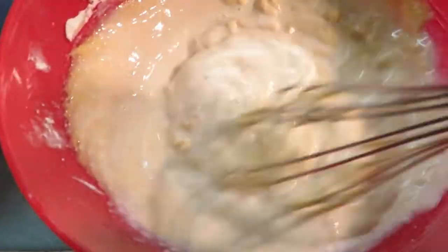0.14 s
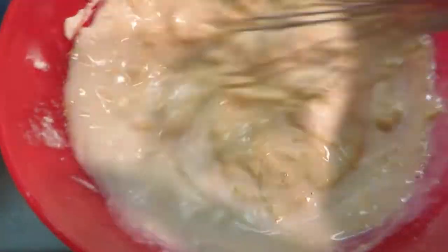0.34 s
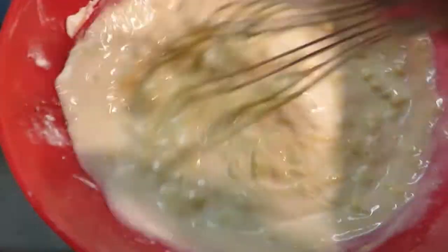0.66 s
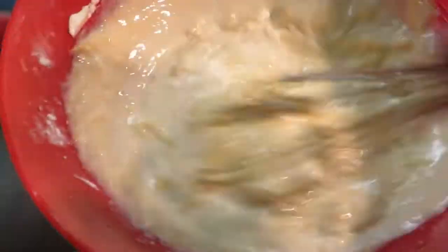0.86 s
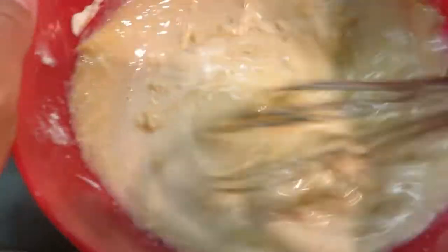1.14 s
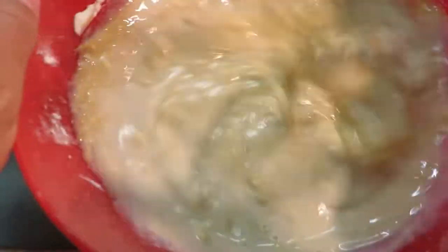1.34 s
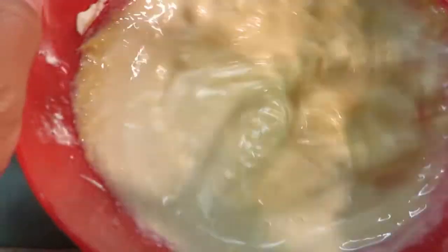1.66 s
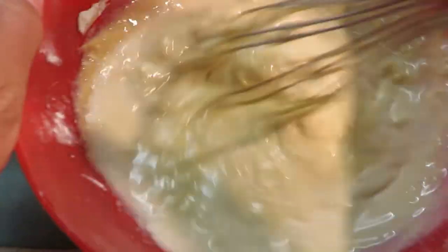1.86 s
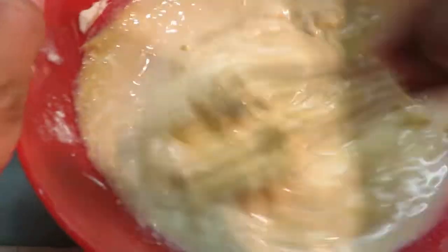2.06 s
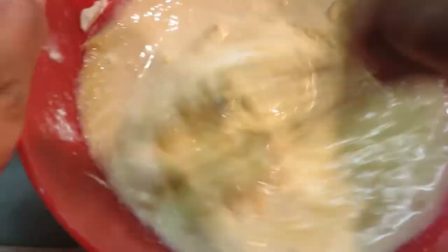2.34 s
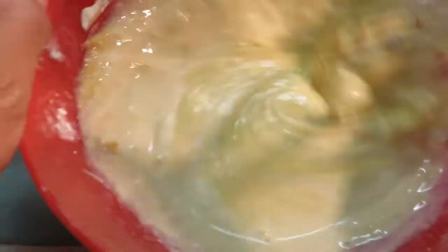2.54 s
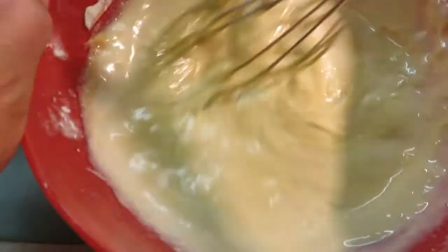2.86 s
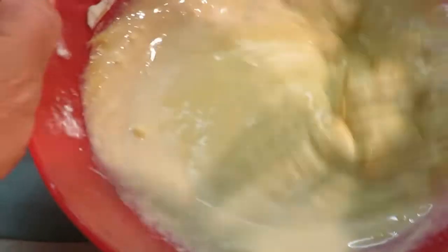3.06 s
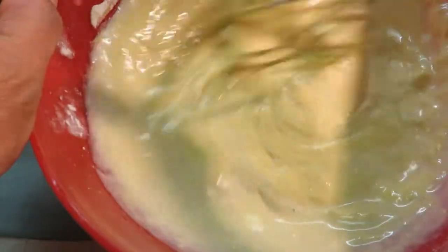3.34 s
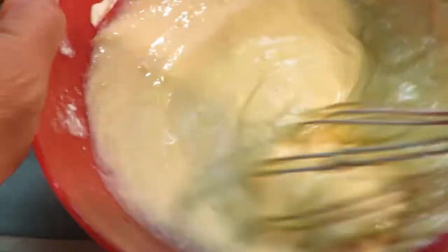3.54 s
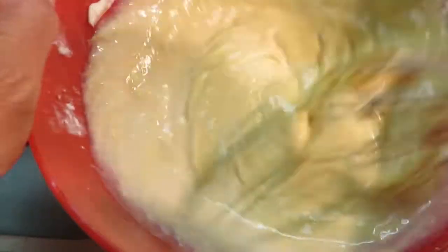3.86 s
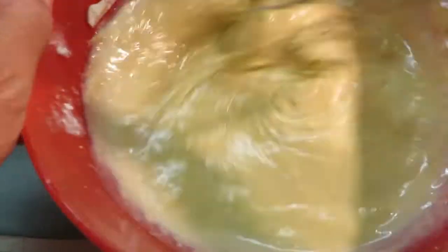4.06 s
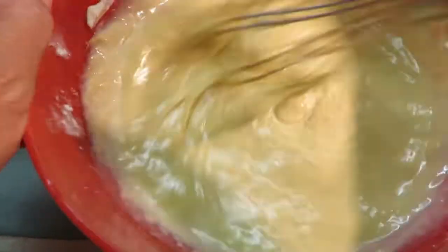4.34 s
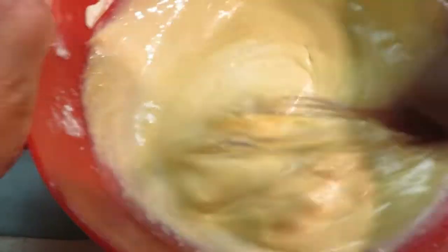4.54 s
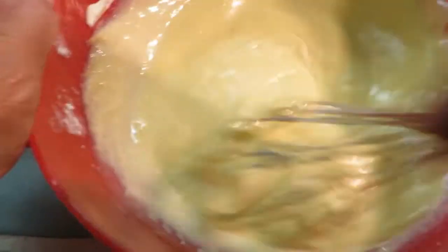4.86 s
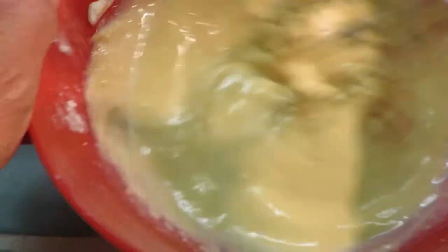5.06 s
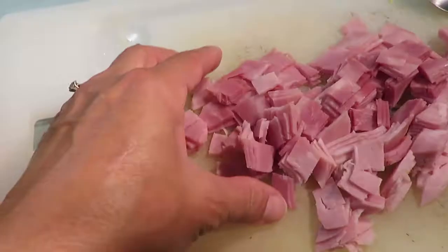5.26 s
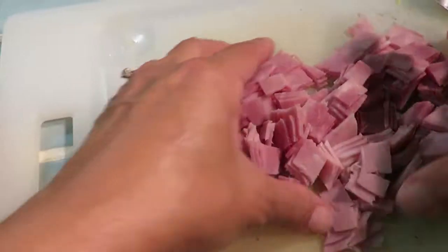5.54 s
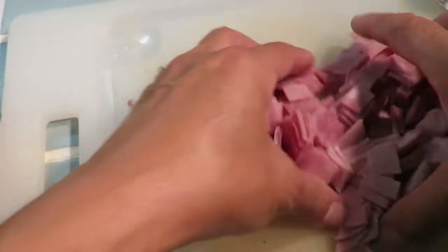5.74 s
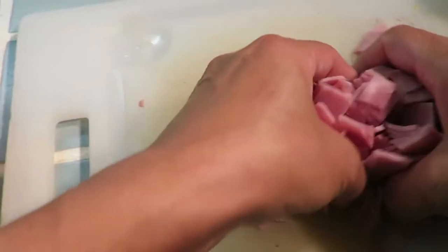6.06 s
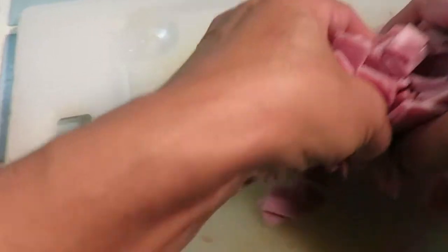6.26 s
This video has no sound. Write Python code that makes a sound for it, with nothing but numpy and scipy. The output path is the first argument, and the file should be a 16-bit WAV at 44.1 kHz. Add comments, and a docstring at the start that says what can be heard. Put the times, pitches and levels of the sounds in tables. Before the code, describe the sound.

A low, slightly beating fan hum with soft air rush runs throughout a small kitchen, heard from very close in stereo. At about 0.1 s a plastic bowl knocks loudly and hollowly on the counter with a rattling tail; the level ducks and creeps back over a second and a half. A second, weaker knock cluster follows near 0.4 s. The wire whisk keeps circling through thin batter, several strokes a second, with fizzy swishes, faint wire scrape, slosh and gurgle. Wet smacks and bubble pops stand out at 1.7, 2.2, 3.5 and 3.7 s, and the strokes become stronger and denser from 4 to 5 s. At 5.1 s the whisking cuts off, leaving fan, a faint airy whistle and a soft low bump. Around 5.8 s a board scuffs in a short stuttering rasp, then moist ham crackles stickily and bits tick until 6.3 s.

```python
"""A wire whisk circles in thin batter, close to a two-port microphone on a kitchen counter: torn films
swish and click, wires scrape, the batter gurgles, pops and pings as damped rings, and wet surfaces smack
as filtered noise. Among this a plastic bowl knocks twice, as decaying modes; the first knock ducks the
camera's gain, which creeps back over a second and a half. After 5.1 s the scene cuts to hands scooping
wet diced ham off a plastic board, which scuffs once in stick-slip crackle. A fan of tones and noise drones."""
import sys
import numpy as np
from scipy import signal
from scipy.fft import rfft, irfft, next_fast_len
from scipy.io import wavfile
from scipy.ndimage import uniform_filter1d, map_coordinates

SR = 44100
rng = np.random.default_rng(int(sys.argv[2]) if len(sys.argv) > 2 else 0)


def unload_wav(signal):
    """Save mono or channel-first audio to the path in sys.argv[1] as 16-bit WAV at rate SR, clipped to [-1, 1]."""
    wavfile.write(
        sys.argv[1],
        SR,
        np.round(np.clip(np.atleast_2d(signal).T, -1, 1) * 32767).astype(np.int16),
    )


N = 282240
CUT_S = 5.115  # here the scene cuts from the bowl to the board


def amp(db):
    """Decibels to gain."""
    return 10 ** (np.asarray(db) / 20)


def unit(x):
    """Scale to rms 1."""
    return x / np.sqrt(np.mean(x ** 2) + 1e-20)


def along(points, hz):
    """Read a curve of (Hz, value) points on a log frequency axis."""
    f, v = np.transpose(points)
    return np.interp(np.log(hz + 1), np.log(f + 1), v)


def curves(rows):
    """One value per sample for each column after the time."""
    s, *columns = np.transpose(rows)
    return [np.interp(np.arange(N) / SR, s, column) for column in columns]


def wobble(rate):
    """A smooth random curve, rate knots a second."""
    knots = rng.standard_normal(int(N * rate / SR) + 4)
    return map_coordinates(knots, [np.arange(N) * rate / SR])


def filtered(x, response):
    """x times a response of frequency."""
    m = next_fast_len(x.shape[-1] + SR // 4)
    spectrum = rfft(x, m) * response(np.fft.rfftfreq(m, 1 / SR))
    return irfft(spectrum, m)[..., :x.shape[-1]]


def coloured(x, spectrum):
    """x shaped by the given spectrum, at rms 1."""
    return unit(filtered(x, lambda hz: amp(along(spectrum, hz))))


def fade(t, t60):
    """Exponential decay by 60 dB in t60 seconds."""
    return np.exp(-np.log(1000) * t / t60)


def add(track, s, sound):
    """Mix a sound into a track at s seconds."""
    part = track[..., max(round(s * SR), 0):][..., :sound.shape[-1]]
    part += sound[..., :part.shape[-1]]


def swells(rows):
    """Gain of overlapping gestures (crest s, dB, rise s, fall s); rise and fall each span 10 dB."""
    t = np.arange(N) / SR
    power = 0
    for s, db, rise, fall in rows:
        steps = np.minimum(np.maximum((s - t) / rise, (t - s) / fall), 10)
        power = power + amp(db - 10 * steps) ** 2
    return np.sqrt(power)


# Likeness of the two microphone ports. Each row: frequency in Hz, left-right likeness from 0 to 1.
PORT_LIKENESS = [(100, 1), (250, 0.99), (700, 0.8), (2000, 0.59), (4000, 0.89), (5500, 0.22), (7500, 0.19),
                 (9500, 0.15), (11000, 0.22), (15000, 0.25)]


def spread(pair):
    """Two unrelated signals to left and right, as alike at each frequency as the two ports hear it."""
    def mid_side_gains(hz):
        angle = np.arccos(np.clip(along(PORT_LIKENESS, hz), -1, 1)) / 2
        return np.array([np.cos(angle), np.sin(angle)])

    mid, side = filtered(pair, mid_side_gains)
    return np.array([mid + side, mid - side])


# Reverberation of the kitchen. Each row: frequency in Hz, t60 in seconds.
KITCHEN_DECAY = [(130, 0.66), (700, 0.48), (2000, 0.33), (10000, 0.26)]


def room(x, delay=.005):
    """The kitchen's answer, delay seconds late: each frequency dies at its own speed."""
    hz, t, z = signal.stft(rng.standard_normal((2, SR // 2)), SR, nperseg=256)
    t60 = along(KITCHEN_DECAY, hz)[:, None]
    tail = spread(signal.istft(z * fade(t, t60), SR, nperseg=256)[1])
    tail = np.pad(tail, ((0, 0), (round(delay * SR), 0))) / np.linalg.norm(tail[0])
    return signal.fftconvolve(np.atleast_2d(x), tail, axes=1)[:, :N]


def patchy(x, depth_db, span_hz, span_s):
    """Brief resonances come and go at random, as when pockets in the batter open and close."""
    z = signal.stft(x, nperseg=512, noverlap=384)[2]
    bins, frames = np.indices(z.shape[1:])
    place = [bins * SR / 512 / span_hz, frames * 128 / SR / span_s]
    field = map_coordinates(rng.standard_normal((128, 512)), place, order=2, mode="wrap")
    gain = amp(depth_db * np.minimum(field, 2))
    return unit(signal.istft(z * gain, nperseg=512, noverlap=384)[1][:, :x.shape[1]])


# The fan's tones as heard at the bowl. Each row: frequency in Hz, relative level in dB.
FAN_TONES_AT_BOWL = [(49, -19), (68, -11.5), (75.4, -7), (127, -17), (134.6, -8.5), (149, -16.5),
                     (177.6, -29.5), (226.1, -13.5), (339.1, -17), (396, -16), (473.7, -20.5)]
# The fan's tones as heard at the board. Each row: frequency in Hz, relative level in dB.
FAN_TONES_AT_BOARD = [(49, -12), (68, -7), (75.4, -4), (134.6, -9.5), (149, -17), (233, -11.5),
                      (242.2, -12.5), (263.8, -15.5), (366.1, -15)]
# Rush of the fan's air. Each row: frequency in Hz, relative spectrum level in dB.
FAN_AIR = [(20, -20), (42, -0.5), (62, 4.5), (95, 1.5), (135, 8.5), (195, -2.5), (260, -2), (380, -2.5),
           (520, -11.5), (800, -19), (1500, -25.5), (5400, -37), (5800, -38), (15000, -57)]
# Thin whistle in that air. Each row: frequency in Hz, relative spectrum level in dB.
FAN_WHISTLE = [(4300, -60), (5000, -4), (5350, 0), (5480, -16), (5700, -60)]
FAN_DB = -32.5  # gain of the whole drone
AIR_DB, WHISTLE_DB = -3.5, -36  # before that gain


def fan():
    """Slightly unsteady motor tones beat over rushing air; at the board the air also whistles faintly."""
    t = np.arange(N) / SR

    def tones(rows):
        total = 0
        for hz, db in rows:
            phase = 2 * np.pi * (hz * t + rng.random()) + 0.28 * wobble(5)
            total = total + amp(db) * np.sqrt(2) * np.sin(phase)
        return total

    at_board = np.clip((t - CUT_S) / 0.0057, 0, 1)
    hum = (1 - at_board) * tones(FAN_TONES_AT_BOWL) + at_board * tones(FAN_TONES_AT_BOARD)
    rush = patchy(spread(rng.standard_normal((2, N))), depth_db=1.5, span_hz=400, span_s=0.09)
    air = coloured(rush, FAN_AIR)
    whistle = at_board * amp(WHISTLE_DB) * coloured(spread(rng.standard_normal((2, N))), FAN_WHISTLE)
    return amp(FAN_DB) * (hum + amp(AIR_DB) * air + whistle)


def crackle(rate, scatter_db):
    """Two streams of tiny ruptures, rate a second, of uneven size, as when liquid films tear."""
    size = amp(scatter_db * np.minimum(rng.standard_normal(N), 2))
    return unit((rng.random(N) < rate / SR) * size * rng.standard_normal((2, N)))


def smacks(rows, body, attack=0.00091, width=0.92, uneven_db=3.8):
    """Short bright spits where a wet surface lets go, coloured by a small cavity and the body below."""
    track, t = np.zeros((2, N)), np.arange(SR // 12) / SR
    grid = np.linspace(0, SR / 2, 56)
    for s, db, hz, t60 in rows:
        cavity = amp(uneven_db * rng.standard_normal(len(grid)))

        def colour(f):
            hump = 1 / (1 + (np.log2((f + 1) / hz) / width) ** 2)  # width in octaves
            return body(f) * np.interp(f, grid, cavity) * hump

        spit = unit(filtered(rng.standard_normal((2, len(t))), colour))
        add(track, s, amp(db - 4) * spit * fade(t, t60) * (1 - np.exp(-t / attack)))
    return spread(track)


# The board slips and catches, some slips screeching brighter. Each row: crest in seconds, relative
# level in dB, rise in seconds per 10 dB, fall in seconds per 10 dB, rasp over that level in dB.
BOARD_SLIPS = [(5.799, -25, 0.015, 0.008, -28), (5.804, -25.5, 0.003, 0.0053, -7),
               (5.813, -21, 0.008, 0.009, -17), (5.826, -22.5, 0.0065, 0.0073, -11),
               (5.858, -32.5, 0.065, 0.019, -18)]
# Colour of the board's scuff. Each row: frequency in Hz, relative spectrum level in dB.
SCUFF_COLOUR = [(250, -11), (440, -2.5), (580, -7.5), (670, 6.5), (760, 3.5), (900, -8), (1040, -2),
                (1170, -12), (1290, -9), (1400, -15), (1530, -14), (1850, -29), (6000, -52)]
# Colour of the board's rasp. Each row: frequency in Hz, relative spectrum level in dB.
RASP_COLOUR = [(1200, -11), (2600, 0.5), (4200, -6), (5500, -11), (12000, -28)]
# The hands press and lift the ham. Each row: crest in seconds, relative level in dB, rise in seconds
# per 10 dB, fall in seconds per 10 dB.
HAM_GRABS = [(5.168, -52.5, 0.012, 0.012), (5.71, -59, 0.25, 0.044), (5.84, -46.5, 0.092, 0.1),
             (5.99, -46, 0.034, 0.061), (6.15, -60, .06, 0.34)]
# Colour of the ham's sticky crackle. Each row: frequency in Hz, relative spectrum level in dB.
STICKY_COLOUR = [(700, -6), (1800, 7), (3200, 10.5), (5000, 7), (9000, 6), (13200, 9.5), (15500, -1)]
# Bits of ham tick on the board. Each row: start in seconds, relative level in dB, centre in Hz,
# t60 in seconds.
HAM_TICKS = [(5.796, -23, 9000, .007), (5.9413, -33, 8500, 0.015), (5.9668, -33, 11000, .014),
             (6.1055, -31.5, 4600, 0.032), (6.1518, -43, 10000, 0.031), (6.2426, -34.5, 2600, 0.032)]


def board(bump_s=5.14, bump_hz=66, bump_db=-19):
    """A soft bump as a decaying sine, the board's stick-slip scuff, crackle and ticks of wet ham."""
    t, bump = np.arange(SR // 2) / SR, np.zeros(N)
    thud = np.sin(2 * np.pi * bump_hz * t) * fade(t, 0.4) * (1 - np.exp(-t / 0.0066))
    add(bump, bump_s, amp(bump_db) * thud)

    grip = patchy(spread(crackle(rate=5000, scatter_db=1.5)), depth_db=1.5, span_hz=111.6, span_s=.025)
    scuff = swells([slip[:4] for slip in BOARD_SLIPS]) * coloured(grip, SCUFF_COLOUR)
    screech = patchy(spread(crackle(rate=3000, scatter_db=3.0)), depth_db=4, span_hz=200, span_s=.02)
    rasp_rows = [(s, db + rasp_db, rise, fall) for s, db, rise, fall, rasp_db in BOARD_SLIPS]
    scuff += swells(rasp_rows) * coloured(screech, RASP_COLOUR)

    peeling = crackle(rate=7000, scatter_db=2.0) + amp(-12) * crackle(rate=320, scatter_db=3.0)
    ham = swells(HAM_GRABS) * amp(1.6 * wobble(50)) * coloured(spread(peeling), STICKY_COLOUR)
    ham = ham + smacks(HAM_TICKS, np.ones_like, width=0.68)
    return bump + scuff + ham + amp(-14.5) * room(scuff + ham)


# Blows of the bowl on the counter. Each row: start in seconds, relative level in dB, hardness in dB
# of the upper modes, level in dB of the lowest mode, level in dB of the wall's middle modes.
BOWL_BLOWS = [(0.1227, 19.5, -1, 1.5, 0.5), (0.1546, 1, -1, 4, -1), (0.187, -5, -16, -1, -6),
              (0.229, 8, -19, -21, 0), (0.2335, -11, -1, -4, -3), (0.371, 9.5, -1, -0.5, 2),
              (0.3825, 2.5, 1.5, 1, 5), (0.3882, 2.5, -5, -8, -2), (0.3954, 3, -12, -6, -1),
              (0.438, -4.5, -5, -9, -6), (0.535, -7.5, -19, -10, 1)]
# Modes of the bowl on the counter. Each row: frequency in Hz, relative level in dB, t60 in seconds.
BOWL_MODES = [(131.7, -8.5, 0.28), (179, -12, 0.18), (231, -4, 0.028), (306, -1.5, 0.039),
              (365, -9.5, 0.076), (515, -5.5, 0.039), (701, -1.5, 0.089), (693, -18.5, 0.3),
              (781, -16, 0.13), (891, -17.5, 0.12), (988, -22.5, 0.14), (1084, -27, 0.16),
              (1205, -9, 0.016), (1584, -1, 0.013), (2080, -9, 0.018), (2500, -11, 0.014),
              (3080, -2, 0.011), (3920, -4.5, 0.0071), (4530, -4, 0.006), (6480, -19, 0.008)]
# Loose rattle of the bowl's wall after a blow. Each row: frequency in Hz, relative spectrum level in dB.
RATTLE_COLOUR = [(150, -18), (400, 3), (750, 2), (1300, -10.5), (2500, -22), (5000, -40), (9000, -51)]
RATTLE_DB, RATTLE_T60_S = -21, 0.29


def knocks(lag=1.21, attack=0.00094, waver_db=1.5, waver=0.33, crack_db=-8):
    """Blows ring the bowl's modes, wavering as batter slops; soft ones start slowly, with weak upper modes."""
    track, t = np.zeros(N), np.arange(SR // 2) / SR
    knots = t[::SR // 100]
    crack_band = signal.butter(2, [1500, 6500], "bandpass", fs=SR, output="sos")

    def slop():
        return np.interp(t, knots, rng.standard_normal(len(knots))) * (1 - np.exp(-t / 0.013))

    for s, db, hard_db, boom_db, wall_db in BOWL_BLOWS:
        ring = np.zeros(len(t))
        for k, (hz, level, t60) in enumerate(BOWL_MODES):
            touch_db = boom_db if hz < 150 else 0 if hz < 600 else wall_db if hz < 1150 else hard_db
            strength = amp(level + rng.normal(0, 1) + touch_db + waver_db * slop())
            # the blow needs a moment to spread through the wall, so each mode lags the one before
            phase = 2 * np.pi * hz * t - k * lag + waver * slop()
            ring += strength * fade(t, t60) * np.sin(phase)
        crack = signal.sosfilt(crack_band, rng.standard_normal(len(t))) * fade(t, .01)
        rattle = amp(RATTLE_DB) * coloured(rng.standard_normal(len(t)), RATTLE_COLOUR)
        rattle *= fade(t, RATTLE_T60_S) * (1 - np.exp(-t / 0.0049))
        onset = 1 - np.exp(-t / (attack * amp(-hard_db)))
        add(track, s, amp(db - 7.0) * (ring + rattle + amp(hard_db + crack_db) * crack) * onset)
    dull = filtered(track, lambda hz: 1 / np.hypot(1, hz / 1900))
    return track + amp(-15) * room(dull)


def damped_ring(t, hz, cycles):
    """A sine that rings for a few cycles, as a bubble does when the liquid around it damps it."""
    ring = np.sin(2 * np.pi * hz * t) * fade(t, cycles / hz) * (1 - np.exp(-2 * t * hz))
    return ring / np.abs(ring).max()


def bubbles(rate, centre_hz, octaves, cycles, scatter_db):
    """A stream of small bubbles of random pitch and size."""
    t, track = np.arange(SR // 40) / SR, np.zeros(N)
    for s, pitch, size in rng.random((int(rate * N / SR), 3)):
        hz = centre_hz * 2 ** (octaves * (2 * pitch - 1))
        add(track, s * N / SR, amp(scatter_db * size) * damped_ring(t, hz, cycles))
    return unit(track)


# Short damped rings, low pops and high pings, some sounding together or along with a smack.
# Each row: start in seconds, peak in dB, pitch in Hz, cycles of ring.
POPS_AND_PINGS = [(1.086, -30, 920, 16), (1.3837, -27.5, 1940, 17), (1.535, -33, 1300, 100),
                  (1.671, -14.5, 1520, 15), (2.2045, -12, 1710, 19), (2.2213, -22.5, 1510, 9),
                  (2.3554, -26.5, 950, 17), (2.356, -31, 1740, 14), (2.491, -24, 3060, 24),
                  (2.8925, -25, 5200, 24), (2.9073, -24.5, 5800, 37), (2.851, -32, 2880, 18),
                  (2.8507, -26, 6700, 40), (3.332, -30, 930, 10), (3.332, -32, 1500, 13),
                  (3.332, -21.5, 7000, 87), (3.365, -28.5, 794, 16), (3.484, -23, 2000, 15),
                  (3.484, -32, 1040, 5.7), (3.72, -22, 2410, 40), (3.7225, -23, 2870, 37),
                  (3.721, -23, 3920, 32), (3.721, -25, 850, 35), (4.03, -33, 900, 16),
                  (4.078, -32, 1390, 33), (4.267, -29, 824, 14), (4.392, -32, 1410, 56),
                  (4.583, -25, 820, 16), (4.653, -30.5, 890, 24), (4.704, -25.5, 1404, 63),
                  (4.887, -24, 860, 12), (4.89, -33, 1490, 16), (4.067, -29, 2820, 27),
                  (4.438, -30.5, 1750, 16)]


def pops_and_pings():
    """Short damped rings, low pops and high pings, some sounding together or along with a smack."""
    track, t = np.zeros(N), np.arange(SR // 20) / SR
    for s, db, hz, cycles in POPS_AND_PINGS:
        add(track, s, amp(db) * damped_ring(t, hz, cycles))
    return track


# Resonances that colour the swish and the smacks. Each row: frequency in Hz, width in Hz, gain in dB.
WIRE_RESONANCES = [(3006, 470, 10.5), (4880, 920, 4.5), (6780, 410, 7.5), (7280, 500, 11), (9150, 290, 5),
                   (10570, 450, 3.5), (12140, 610, 6), (13460, 500, 7)]


def wires(f):
    """Gain of the whisk's resonances at each frequency."""
    return 1 + sum((amp(db) - 1) / (1 + (2 * (f - hz) / width) ** 2) for hz, width, db in WIRE_RESONANCES)


# Sweeps of the whisk through the batter. Each row: crest in seconds, relative level in dB, rise in
# seconds per 10 dB, fall in seconds per 10 dB.
WHISK_SWEEPS = [(0.0, -49.5, .05, 0.019), (0.16, -42, 0.028, 0.17), (0.25, -45.5, 0.061, 0.072),
                (0.55, -43, 0.14, 0.095), (0.85, -45, 0.15, 0.38), (1.17, -42.5, 0.069, 0.11),
                (1.29, -41, 0.01, 0.014), (1.42, -41.5, 0.036, 0.043), (1.58, -44.5, 0.16, 0.052),
                (1.72, -44.5, 0.1, 0.16), (1.88, -45, 0.16, 0.1), (2.01, -43.5, 0.12, 0.15),
                (2.16, -40, 0.014, 0.049), (2.31, -43, 0.11, 0.07), (2.72, -46.5, 0.18, 0.076),
                (2.9, -55, 0.025, 0.1), (3.15, -43, 0.12, 0.092), (3.63, -44.5, 0.22, 0.064),
                (3.74, -50, 0.013, 0.1), (3.9, -41, 0.072, 0.097), (4.09, -51, 0.016, 0.09),
                (4.22, -38.5, 0.064, 0.079), (4.42, -45, 0.034, 0.074), (4.55, -38.5, 0.061, 0.066),
                (4.72, -45.5, 0.032, 0.11), (4.86, -38, 0.066, 0.047), (5.025, -45, 0.019, 0.034),
                (5.1, -49, 0.024, 0.024)]
# Short low gurgling bursts in the batter, many under a smack. Each row: crest in seconds, relative
# level in dB.
GURGLE_BURSTS = [(1.537, -38), (2.358, -43), (2.85, -43.5), (3.333, -41), (3.366, -39), (3.724, -39.5),
                 (3.781, -37), (3.816, -39.5), (4.07, -36.5), (4.082, -37.5), (4.126, -42.5), (4.396, -38),
                 (4.585, -36.5), (4.702, -32), (4.891, -38)]
BURST_RISE_S, BURST_FALL_S = 0.0072, 0.016  # per 10 dB
BURST_SWISH_DB = -8.5  # swish that goes with a burst, over its gurgle gain
SETTLE_S, WAKE_DB = 0.094, -3  # the batter churns on behind the wires: time constant, level


def stirring():
    """Gains of the swish and of the gurgle: sweeps leave a churning wake, bursts lift both gains briefly."""
    sweep = swells(WHISK_SWEEPS)
    burst = swells([(s, db, BURST_RISE_S, BURST_FALL_S) for s, db in GURGLE_BURSTS])
    keep = np.exp(-1 / (SETTLE_S * SR))
    wake = signal.lfilter([1 - keep], [1, -keep], sweep)
    at_bowl = np.arange(N) / SR < CUT_S
    swish = at_bowl * np.hypot(sweep, amp(BURST_SWISH_DB) * burst)
    gurgling = at_bowl * np.hypot(burst, amp(WAKE_DB) * wake)
    return swish, gurgling


SPIT_COUNT, SPIT_DB, SPIT_HZ, SPIT_T60_S = 30, 22, 2800, 0.0083  # dB over the swish, at most


def spits(swish):
    """Small smacks at random moments of the whisking, following the strength of the swish around them."""
    rows = []
    for when, size, pitch in rng.random((SPIT_COUNT, 3)):
        s = when * CUT_S
        strength = swish[int(s * SR)] * (1 + size) / 2
        db = SPIT_DB + 20 * np.log10(strength + 1e-9)
        rows.append((s, db, SPIT_HZ * 2 ** (2 * pitch - 1), SPIT_T60_S))
    return rows


# How deep the whisk runs; deeper gurgles more and fizzes less. Each row: time in seconds, depth in dB.
WHISK_DEPTH = [(0, 0.5), (1.4, -3.5), (2.0, -5), (2.5, 0.5), (3.2, 3), (3.6, 1), (4.2, 2), (5.1, -1.5)]
# Colour of the fizz. Each row: frequency in Hz, relative spectrum level in dB.
FIZZ_COLOUR = [(2500, -27), (5000, -19), (6500, -6.5), (8500, 0), (10000, -3), (13800, -6), (15500, -13)]
# Colour of the slosh. Each row: frequency in Hz, relative spectrum level in dB.
SLOSH_COLOUR = [(600, -15), (1500, -4.5), (2400, -5), (4100, -3), (5500, -1), (8000, -24.5), (14000, -34)]
# Ring of the wires dragging on the bowl's floor. Each row: frequency in Hz, relative spectrum level in dB.
SCRAPE_COLOUR = [(2700, -23), (3200, -7), (3450, 4), (3700, -13), (4300, -34)]
# Colour of the gurgle. Each row: frequency in Hz, relative spectrum level in dB.
GURGLE_COLOUR = [(300, -2.5), (570, -10), (850, 1.5), (1000, -1), (1200, -11), (1420, 0), (1600, -6),
                 (2200, -5), (3000, -9), (6000, -49)]
FIZZ_DB, FIZZ_PER_DEPTH = 3.0, -0.41  # level over the swish, dB per dB of depth
SCRAPE_DB, SCRAPE_PER_DEPTH = -9.5, -1.35  # likewise; strongest when the whisk runs shallow
SLOSH_DB, FROTH_DB = -0.5, -5  # over the swish; froth is tiny bubbles bursting


def whisk(swish, gurgling):
    """Wires tear films into fizz, scrape the bowl, slosh batter and fold in air that gurgles and froths."""
    depth_db, = curves(WHISK_DEPTH)
    # countless tiny ruptures, with single droplets clicking among them
    ruptures = crackle(rate=12000, scatter_db=2.5) + amp(-13.0) * crackle(rate=200, scatter_db=6.0)
    tearing = patchy(spread(filtered(ruptures, wires)), depth_db=4.5, span_hz=199.2, span_s=.028)
    tearing = tearing * amp(1.63 * wobble(60))
    fizz = swish * amp(FIZZ_PER_DEPTH * depth_db + FIZZ_DB) * coloured(tearing, FIZZ_COLOUR)

    sloshing = patchy(tearing, depth_db=3.5, span_hz=160.3, span_s=0.02)
    slosh = swish * amp(SLOSH_DB) * coloured(sloshing, SLOSH_COLOUR)

    dragging = coloured(spread(crackle(rate=190, scatter_db=3.5)), SCRAPE_COLOUR)
    scrape = swish * amp(SCRAPE_DB + SCRAPE_PER_DEPTH * depth_db) * dragging

    air = bubbles(rate=350, centre_hz=1158, octaves=1.05, cycles=15.4, scatter_db=17.5)
    churn = patchy(spread(crackle(rate=2500, scatter_db=7.0)), depth_db=10.5, span_hz=120.5, span_s=0.035)
    gurgle = gurgling * amp(depth_db + 3.5) * coloured(amp(-7.5) * air + churn, GURGLE_COLOUR)

    froth = bubbles(rate=300, centre_hz=3005, octaves=1.0, cycles=39, scatter_db=14)
    return fizz + slosh + scrape + gurgle + swish * amp(FROTH_DB) * froth


# The loudest wet smacks. Each row: start in seconds, relative level in dB, centre in Hz, t60 in seconds.
WET_SMACKS = [(0.556, -26, 2460, 0.02), (0.677, -26, 2200, 0.025), (0.8265, -21, 7000, 0.022),
              (0.9922, -21.5, 6000, 0.012), (1.087, -23.5, 1970, 0.035), (1.1413, -23, 6000, .02),
              (1.3832, -22, 2420, 0.027), (1.4247, -19.5, 5970, 0.026), (1.5699, -22, 3100, 0.013),
              (1.5843, -17, 3000, 0.013), (1.6701, -13.5, 1900, 0.015), (1.7175, -21, 3430, 0.017),
              (1.8682, -20.5, 3800, 0.023), (1.8835, -16.5, 5200, 0.01), (1.9967, -17, 4500, 0.008),
              (2.2036, -5.5, 3140, 0.0083), (2.2213, -14, 2500, 0.01), (2.2335, -16.5, 2200, 0.0096),
              (2.4908, -23, 4470, 0.015), (2.5441, -32, 7140, 0.024), (2.5606, -23, 4500, 0.0097),
              (2.5894, -26, 4500, 0.009), (2.850, -20.5, 3000, 0.008), (2.8919, -20.5, 5300, 0.013),
              (2.9056, -24, 5340, 0.015), (3.1639, -19, 4500, 0.008), (3.3316, -14, 6360, 0.014),
              (3.3648, -18.5, 3380, 0.02), (3.400, -19.5, 3000, 0.01), (3.4162, -24, 3200, 0.008),
              (3.44, -25, 4000, 0.0064), (3.484, -12.5, 2400, 0.0085), (3.718, -6, 9500, 0.015),
              (3.7725, -12.5, 3070, 0.016), (3.782, -27, 6000, 0.012), (3.8114, -13, 7000, 0.011),
              (3.9047, -17, 4600, 0.0069), (4.064, -14, 6940, 0.017), (4.093, -16, 3560, 0.013),
              (4.131, -12, 7400, 0.014), (4.1468, -13, 7000, 0.009), (4.2044, -18, 3200, 0.014),
              (4.3116, -22, 2500, 0.01), (4.437, -13.5, 6000, 0.021), (4.582, -21, 1900, 0.012),
              (4.588, -17.5, 7000, .01), (4.678, -25, 3000, 0.01), (4.695, -17, 6500, .012),
              (4.6998, -10.5, 6150, 0.011), (4.723, -23, 4500, .007), (4.7505, -12, 6950, 0.011),
              (4.77, -21, 4500, 0.012)]


def batter(lead=.000028, wire_share=0.83):
    """The batter's wet sounds; their treble reaches the left microphone port a little late and weak."""
    swish, gurgling = stirring()
    wet_smacks = smacks(list(WET_SMACKS) + spits(swish), lambda f: wires(f) ** wire_share)
    near = whisk(swish, gurgling) + pops_and_pings() + wet_smacks
    sides = np.array([[1], [-1]])

    def ports(hz):
        treble = np.clip(hz / 3000 - 1, 0, 1)  # sets in at 3 kHz, full from 6 kHz
        return np.exp(-sides * (1j * np.pi * hz * lead + 0.049) * treble)

    near = filtered(near, ports)
    return near + amp(-13.5) * room(near)


def scene():
    """Bowl, batter, board and fan."""
    return knocks() + batter() + board() + fan()


LIMIT_DB, RECOVER_DB_PER_S = -4.5, 10.5  # gain control: highest 10 ms level, speed of recovery
TOP_HZ = 15900  # band limit


def record(dry):
    """The camera ducks its gain at once on a loud sound, recovers slowly, clips and limits the band."""
    power = np.abs(uniform_filter1d(np.mean(dry ** 2, axis=0), size=SR // 100))
    excess_db = np.maximum(10 * np.log10(power + 1e-12) - LIMIT_DB, 0)
    recovery_db = RECOVER_DB_PER_S * np.arange(N) / SR
    duck_db = np.maximum.accumulate(excess_db + recovery_db) - recovery_db
    clipped = np.clip(dry * amp(-duck_db), -1, 1)
    return filtered(clipped, lambda hz: hz < TOP_HZ)


dry = scene()
out = record(dry)
unload_wav(out)
```